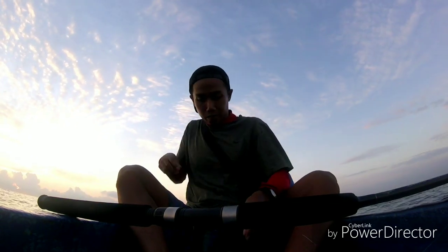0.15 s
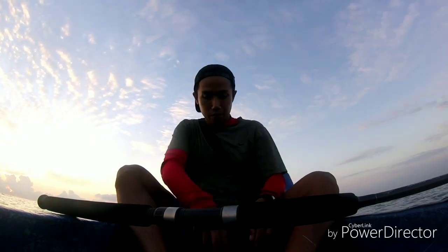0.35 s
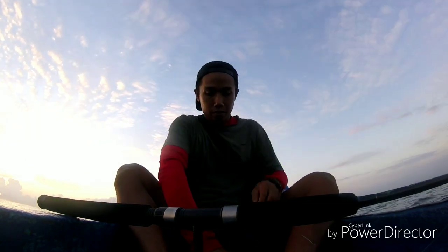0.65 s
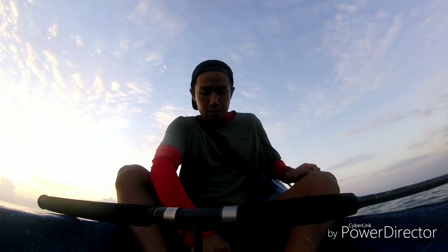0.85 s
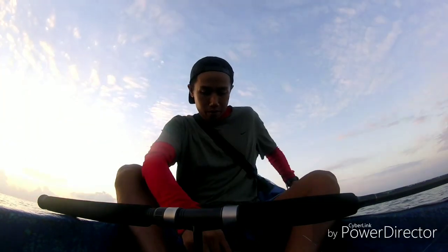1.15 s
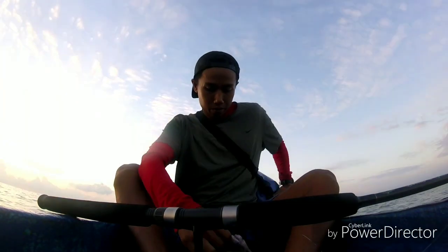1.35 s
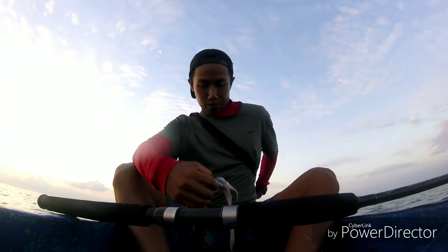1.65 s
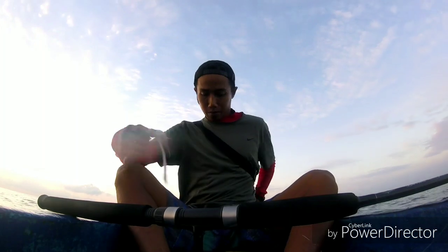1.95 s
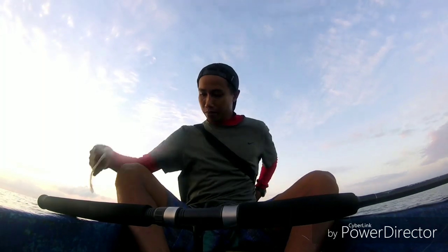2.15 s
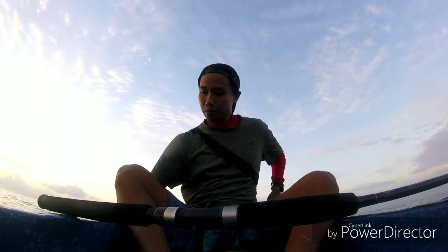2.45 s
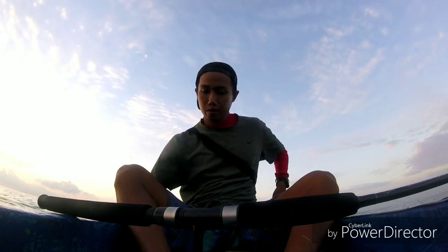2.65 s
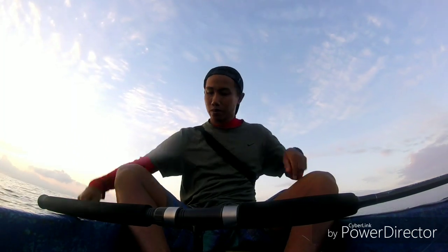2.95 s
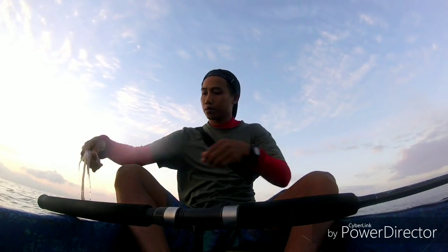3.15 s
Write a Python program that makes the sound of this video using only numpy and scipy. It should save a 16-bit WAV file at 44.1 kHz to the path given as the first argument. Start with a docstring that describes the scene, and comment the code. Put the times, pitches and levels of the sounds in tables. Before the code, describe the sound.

On open sea, water knocks and gurgles irregularly along a kayak's plastic hull, heard from a deck-mounted microphone buffeted by wind; brief bright crackles of handled gear come first, then a few faint drips near the end.

```python
"""Kayak deck on small waves

Small waves lap a hollow plastic kayak, heard by a camera fixed to its deck. Each wave slaps the hull (noise bursts
through resonances), then gurgles in air pockets that sink in pitch as it runs along (damped gliding tones).
A hand rummages among crackling wet gear (short bright bursts) and drops plink (small rising tones).
Wind buffets the microphone and the sea washes, fizzes and hisses (coloured, patchy noise)."""
import sys
import numpy as np
from scipy import signal
from scipy.fft import rfft, irfft, next_fast_len
from scipy.io import wavfile
from scipy.ndimage import uniform_filter1d, map_coordinates

SR = 44100
rng = np.random.default_rng(int(sys.argv[2]) if len(sys.argv) > 2 else 0)


def materialize(psi):
    """Save the field psi as 16-bit PCM at rate SR to the path in sys.argv[1].

    A 1-D psi becomes a single channel; in a 2-D psi each row is a channel.
    """
    bounded = np.clip(np.atleast_2d(psi).T, -1, 1)
    quanta = np.round(bounded * 32767).astype(np.int16)
    wavfile.write(sys.argv[1], SR, quanta)


N = 145530

# Noise colours; levels are relative, each noise is set to rms 1 afterwards.
# low wash of the sea, carried by the hull: [f/Hz, level/dB]
WASH_COLOUR = [(35, -15), (60, -4.5), (277, -5), (577, -15.5), (764, -17.5), (2500, -39), (3250, -44),
               (5500, -120)]
# spitting fizz of the sea: [f/Hz, level/dB]
FIZZ_COLOUR = [(900, -33), (2000, -7), (4000, -13), (6500, -10.5), (9000, -120)]
# steady hiss with the microphone's treble peak: [f/Hz, level/dB]
HISS_COLOUR = [(2500, -120), (4000, -27), (5900, -14.5), (6550, 3.5), (7200, -4), (9300, -9), (10200, -16),
               (12800, -15), (14400, -33)]
# wind rumble on the microphone port: [f/Hz, level/dB]
RUMBLE_COLOUR = [(12, -19.5), (25, 9), (60, 2), (110, -6.5), (250, -19.5), (900, -120)]
# churned water: [f/Hz, level/dB]
CHURN_COLOUR = [(150, -120), (350, 6), (1100, -9), (6000, -120)]

# course of the fizz: [t/s, level/dB]
FIZZ_LEVEL = [(0, -67.5), (.45, -68.5), (.62, -53), (.85, -63), (1.0, -63.5), (1.27, -58), (2.3, -67.5),
              (2.85, -71), (3.0, -59.5), (3.3, -64.5)]
# course of the wind buffeting: [t/s, level/dB]
WIND_LEVEL = [(0, -44), (.07, -49), (.12, -24), (.22, -50.5), (.42, -34.5), (.53, -25.5), (.62, -28),
              (.78, -34), (.95, -37.5), (1.6, -48), (1.83, -28), (2.0, -43), (2.25, -32), (2.7, -55),
              (2.76, -32), (2.9, -46.5), (3.09, -45.5), (3.14, -31.5), (3.3, -32.5)]

# water drops: [t/s, level/dB before the envelope, starting pitch f/Hz, life/cycles]
DROPS = [(2.667, -40.5, 1820, 16), (2.908, -48, 3300, 12), (3.203, -47.5, 1960, 19),
         (3.265, -37.5, 4530, 23)]
# crackles of the gear: [t/s, nominal peak level/dB, brightest f/Hz]
CRACKLES = [(0.5405, -29, 3640), (0.5611, -23.5, 6600), (0.578, -29, 2800), (0.6008, -37, 5330),
            (0.611, -38, 5000), (0.626, -39, 3000), (0.634, -28.5, 5300), (0.6509, -31.5, 2900),
            (0.6586, -30, 4900), (0.686, -43, 4500), (0.698, -23, 6700), (0.748, -33.5, 2170),
            (0.7651, -29, 3000), (0.7862, -34, 4330), (0.795, -38, 4500), (0.821, -35, 2790),
            (0.868, -30.5, 6650), (1.0662, -24.5, 4300), (1.2204, -51, 6400), (1.2485, -31.5, 6000),
            (1.264, -35, 3670), (1.2834, -27, 5600), (1.3187, -32, 3440), (1.403, -38.5, 2520),
            (1.6068, -39.5, 3030), (1.9066, -40.5, 4500), (2.532, -40, 2630), (2.5641, -40, 3420),
            (2.685, -39.5, 2430), (3.130, -44, 5900), (3.1435, -40, 5740), (3.154, -41, 6400),
            (3.1683, -39.5, 5870)]
# slaps of water on the hull: [t/s, nominal peak level/dB, brightest f/Hz]
SLAPS = [(0.0213, -20, 930), (0.0765, -20.5, 950), (0.092, -18, 1090), (0.539, -25, 615), (0.624, -21, 810),
         (0.702, -23.5, 880), (0.709, -25, 1190), (0.743, -28, 766), (0.767, -23.5, 617), (0.82, -30, 860),
         (0.873, -29, 670), (0.998, -28.5, 795), (1.032, -29, 850), (1.048, -22.5, 810),
         (1.065, -22.5, 1240), (1.113, -25, 690), (1.291, -23, 756), (1.319, -22, 700), (1.453, -27.5, 674),
         (1.702, -31, 1030), (1.719, -23, 960), (1.753, -22, 690), (1.77, -24, 820), (1.79, -29.5, 890),
         (2.0, -29, 600), (2.203, -19, 960), (2.226, -30.5, 1110), (2.254, -31, 900), (2.273, -32, 850),
         (2.684, -27.5, 865), (2.729, -17.5, 750), (2.774, -34, 805), (3.118, -27, 1070), (3.155, -22, 870),
         (3.171, -29, 930)]
# modes of the plastic shell: [f/Hz, width/Hz, level/dB]
HULL_MODES = [(464, 34.5, 11.5), (710, 225, 0), (854.7, 30.4, 6), (961, 63, 0), (1217, 162, 1.5),
              (1309, 267, -2), (1700, 220, -8.5)]
# the gurgle of each wave: [t/s, length/s, base level/dB, first pitch f/Hz, pitch at the end of its length f/Hz]
WAVES = [(.09, 0.087, -30.5, 250, 132), (.70, .14, -31, 289, 157), (1.106, 0.085, -28.5, 404, 240),
         (1.72, 0.12, -29, 280, 120), (2.202, 0.14, -29.5, 232.5, 153), (2.73, 0.094, -28.5, 306, 158),
         (3.12, 0.16, -38, 230, 180)]
# the clearest air pockets: [t/s, level/dB before the envelope, starting pitch f/Hz, life/cycles]
CLEAR_POCKETS = [(.104, -9, 204, 0.84), (.116, -17.5, 186, 2.2), (.134, -18.5, 173, 2.2),
                 (.742, -16, 248, 1.53), (.752, -16.5, 137, 1.84), (1.069, -19, 424, 10.7),
                 (1.116, -31, 396, 6.8), (1.140, -24, 323, 3.5), (1.370, -23, 337, 1.54),
                 (1.457, -27.5, 382, 6.1), (1.499, -13, 314, 0.68), (1.718, -14, 283, 2.07),
                 (1.729, -16, 213, 2.9), (1.770, -15.5, 187, 2.25), (1.792, -16, 203, 1.5),
                 (1.811, -21.5, 140, 1.4), (2.219, -26, 208, 3.3), (2.247, -18, 142, 3),
                 (2.438, -24.5, 362, 2.7), (2.733, -16, 337, 5.7), (2.741, -20.5, 474, 6),
                 (2.756, -33, 287, 2.1), (2.773, -20, 288, 3.8), (3.128, -21.5, 230, 3.6),
                 (3.178, -19.5, 203, 3.3)]

WASH_DB, HISS_DB = -40.5, -64  # wash before its slow wobble
DROP_RISE, DROP_ROUGH = 0.01, 1  # share of pitch gained a cycle; wavering of the phase/rad
CRACKLE_S, CRACKLE_T60_S = 0.004, 0.022  # main length; 60 dB fall time after it
CRACKLE_WIDTH, RING_WIDTH = 1.6, 0.071  # broad and narrow resonance: width over pitch
CRACKLE_GRIT_DB, CRACKLE_TOP_HZ = 4, 7400
SLAP_S, SLAP_T60_S, SLAP_WIDTH = 0.0086, 0.067, 0.54  # as for the crackles
SPATTER_DB, SPATTER_HZ, SPATTER_S = -25.5, 2230, 0.014  # level against the slap; pitch; main length
POCKET_SAG, POCKET_RISE_CYCLES = 0.0032, 0.53  # share of pitch lost a cycle; build-up
POCKET_SCATTER, POCKET_CYCLES = 0.2, 1.32  # small pockets: spread of log pitch; life
POCKET_REACH = 1.3  # small pockets last this many lengths of the wave
CHURN_DB = -16  # against the smoothed level of the pockets
TOP_HZ = 14530  # band limit of the camera


def amp(db):
    """Amplitude of a level in dB."""
    return 10 ** (np.asarray(db) / 20)


def unit(x):
    """x scaled to rms 1."""
    return x / np.sqrt(np.mean(x ** 2) + 1e-20)


def curve(rows):
    """A table of times and values as one value per sample."""
    t, values = np.transpose(rows)
    return np.interp(np.arange(N) / SR, t, values)


def wobble(rate):
    """A smooth random curve, rate knots a second."""
    knots = rng.standard_normal(int(N * rate / SR) + 4)
    return map_coordinates(knots, [np.arange(N) * rate / SR])


def filtered(x, response):
    """x through a complex response of frequency, padded so that the ringing has room."""
    m = next_fast_len(len(x) + 8192)
    f = np.fft.rfftfreq(m, 1 / SR) + 1  # 1 Hz up, to keep clear of zero
    return irfft(rfft(x, m) * response(f), m)[:len(x)]


def rush(colour, patchy_db):
    """Coloured noise of rms 1 whose gain varies in random patches of time and frequency."""
    z = signal.stft(rng.standard_normal(N), nperseg=512)[2]
    field = uniform_filter1d(rng.standard_normal(z.shape), size=5, axis=0)
    field = uniform_filter1d(field, size=6, axis=1)
    x = signal.istft(z * amp(patchy_db * unit(field)), nperseg=512)[1][:N]
    f, db = np.transpose(colour)
    return unit(filtered(x, lambda hz: amp(np.interp(np.log(hz), np.log(f), db))))


def add(out, s, x):
    """Mix x into out from time s."""
    part = out[round(s * SR):][:len(x)]
    part += x[:len(part)]


def peak(f, hz, width_hz):
    """A causal resonance."""
    return 1j * f * width_hz / (hz * hz - f * f + 1j * f * width_hz)


def bubbles(rows, glide, rise_cycles, overtone, rough):
    """Damped tones whose pitch glides by a share each cycle, lopsided by an overtone and a wavering phase."""
    out, t = np.zeros(N), np.arange(SR // 8) / SR
    for s, db, hz, life in rows:
        cycles = hz * t
        shape = (1 - np.exp(-cycles / rise_cycles)) * np.exp(-(cycles / life) ** 2)
        waver = np.interp(cycles / 2, np.arange(400), rng.standard_normal(400))
        phase = 2 * np.pi * cycles * (1 + glide * cycles / 2) + rough * waver
        # the overtone fades faster than the tone
        tone = np.sin(phase) - overtone * shape * np.cos(2 * phase)
        add(out, s, amp(db) * shape * tone)
    return out


def bursts(rows, length, body, width, t60, grit_db, blow, uneven_db, uneven_hz, ring):
    """A sharp blow and gritty noise through a body, each with its own resonance, ring and uneven colour."""
    out, t = np.zeros(N), np.arange(SR // 10) / SR
    # a gentle fall throughout, and a steeper one after the main length
    shape = amp(-60 * np.maximum(t - length, 0) / t60 - 4 * t / length)
    for s, db, hz in rows:
        noise, grit, colour = rng.standard_normal((3, len(t)))
        grit_gain = amp(grit_db * unit(uniform_filter1d(grit, size=60)))
        force = noise * grit_gain * shape + blow * (t == 0)

        def response(f):
            uneven = amp(uneven_db * np.interp(f / uneven_hz, np.arange(len(t)), colour))
            resonance = peak(f, hz, hz * width) + ring * peak(f, hz, hz * RING_WIDTH)
            return body(f) * uneven * resonance

        x = filtered(force, response)
        # equal energy for equal level; 8.5 dB is the allowance from peak to body of the burst
        add(out, s, amp(db - 8.5) * x / np.sqrt(np.sum(x ** 2) / np.sum(shape ** 2)))
    return out


def sea():
    """Low wash carried by the hull, spitting fizz, and the steady hiss with the microphone's treble peak."""
    wash = amp(WASH_DB + 1.2 * wobble(14)) * rush(WASH_COLOUR, patchy_db=1.4)
    spitting = unit(amp(3 * wobble(130)) * rush(FIZZ_COLOUR, patchy_db=1.2))
    fizz = amp(curve(FIZZ_LEVEL)) * spitting
    hiss = amp(HISS_DB) * rush(HISS_COLOUR, patchy_db=1.5)
    return wash + fizz + hiss


def wind():
    """Lumpy buffeting on the microphone port: low noise that follows the gusts."""
    return amp(curve(WIND_LEVEL)) * rush(RUMBLE_COLOUR, patchy_db=2.5)


def drops():
    """Falling drops plink: damped tones that rise slightly in pitch, with a wavering phase."""
    return bubbles(DROPS, DROP_RISE, rise_cycles=0.8, overtone=0, rough=DROP_ROUGH)


def crackles():
    """A hand among wet gear: short bright bursts with a narrow ring, cut off steeply on top."""
    def gear(f):
        return peak(f, 5930, 1200) + 3.1 * peak(f, 2170, 5700)

    x = bursts(CRACKLES, CRACKLE_S, gear, CRACKLE_WIDTH, CRACKLE_T60_S, CRACKLE_GRIT_DB,
               blow=8, uneven_db=3.5, uneven_hz=600, ring=1.2)
    return filtered(x, lambda f: 1 / (1 + (f / CRACKLE_TOP_HZ) ** 9))


def hull(f):
    """Response of the plastic shell: its modes added with alternating sign."""
    return sum((-1) ** k * amp(db) * peak(f, hz, width_hz)
               for k, (hz, width_hz, db) in enumerate(HULL_MODES))


def slaps():
    """Water strikes the plastic shell and rings its modes: a blow and a noise burst through the hull."""
    return bursts(SLAPS, SLAP_S, hull, SLAP_WIDTH, SLAP_T60_S, grit_db=2,
                  blow=9, uneven_db=1, uneven_hz=250, ring=0)


def spatter():
    """Droplets thrown by each slap: a fainter, higher burst of gritty noise that starts with it."""
    rows = [(s, db + SPATTER_DB, SPATTER_HZ) for s, db, _ in SLAPS]
    return bursts(rows, SPATTER_S, lambda f: peak(f, SPATTER_HZ, 1860) ** 2, SLAP_WIDTH, SLAP_T60_S,
                  grit_db=3.5, blow=0, uneven_db=5, uneven_hz=261, ring=0)


def small_pockets(count=14):
    """The string of small air pockets trapped by each wave, sinking in pitch and level along the hull."""
    rows = []
    for s, length, db, first_hz, last_hz in WAVES:
        along = POCKET_REACH * (np.arange(count) + rng.random(count)) / count  # 1 is the wave's length
        pitch_chance, level_chance = rng.standard_normal((2, count))
        hz = first_hz * (last_hz / first_hz) ** along * np.exp(POCKET_SCATTER * pitch_chance)
        level_db = db + 10 - 6 * along ** 2 + 3.8 * level_chance
        rows += zip(s + length * along, level_db, hz, np.full(count, POCKET_CYCLES))
    return rows


def gurgle():
    """Air pockets sound as damped, sagging tones; churned water rustles along with their level."""
    pockets = bubbles(CLEAR_POCKETS + small_pockets(), -POCKET_SAG, POCKET_RISE_CYCLES,
                      overtone=0.16, rough=0.14)
    pocket_level = uniform_filter1d(abs(pockets), size=900)
    rustle = unit(amp(2.9 * wobble(120)) * rush(CHURN_COLOUR, patchy_db=1.5))
    return pockets + amp(CHURN_DB) * pocket_level * rustle


def scene():
    """All layers as they reach the camera on the deck, one channel."""
    background = sea() + wind()
    return (background + drops() + crackles() + slaps() + spatter() + gurgle())[None]


def record(dry):
    """The camera keeps nothing above its band limit."""
    return filtered(dry[0], lambda hz: hz < TOP_HZ)[None]


dry = scene()
out = record(dry)
materialize(out)
```